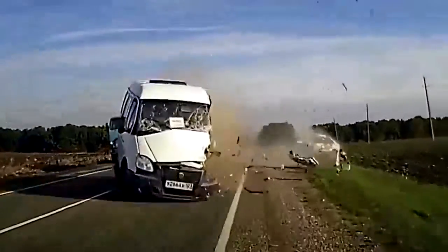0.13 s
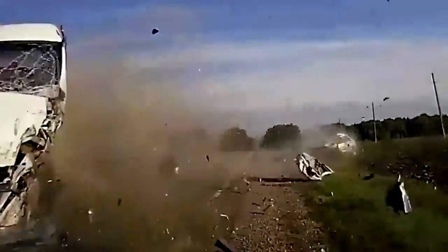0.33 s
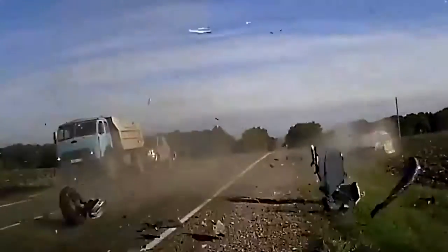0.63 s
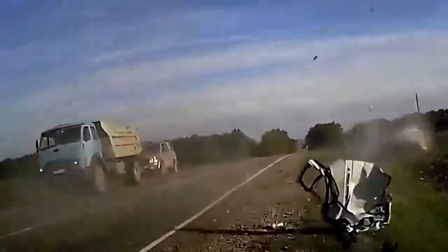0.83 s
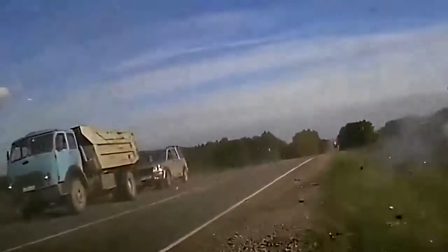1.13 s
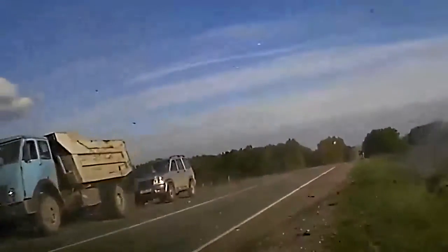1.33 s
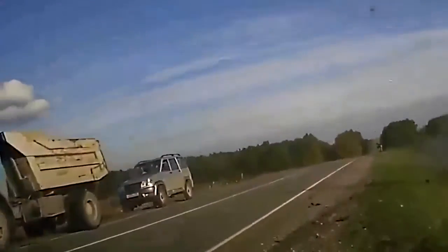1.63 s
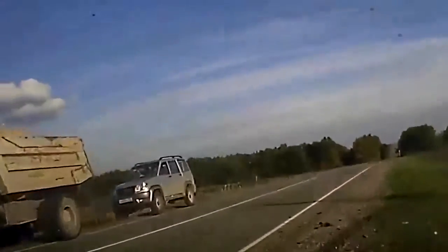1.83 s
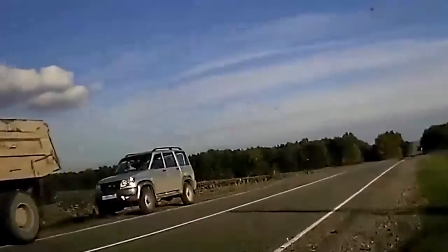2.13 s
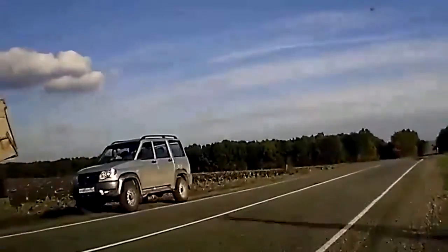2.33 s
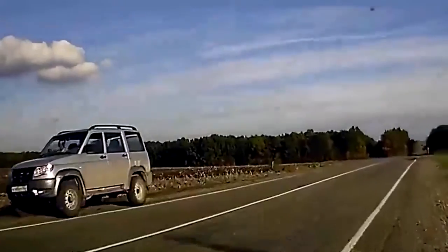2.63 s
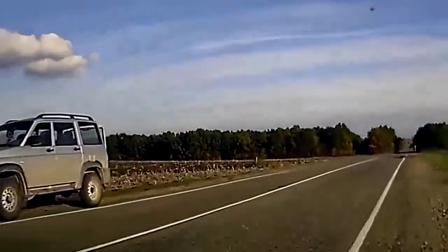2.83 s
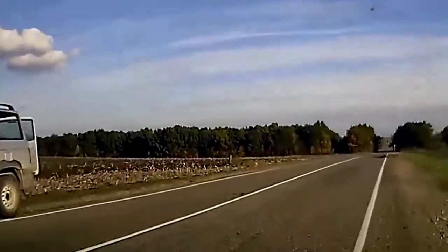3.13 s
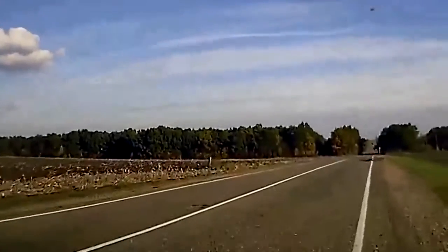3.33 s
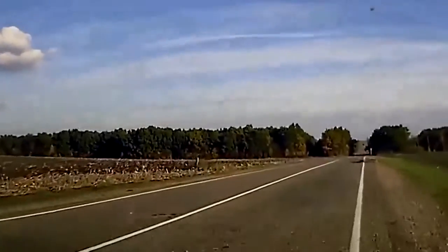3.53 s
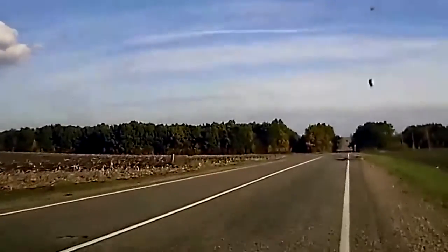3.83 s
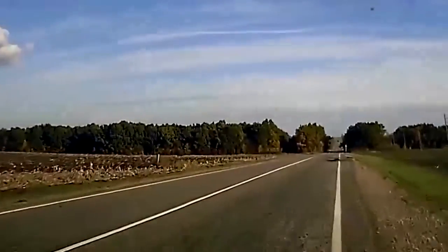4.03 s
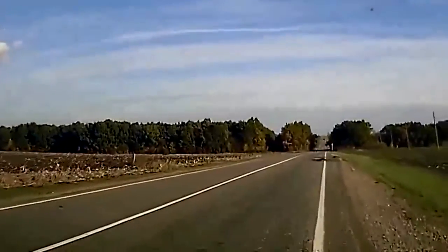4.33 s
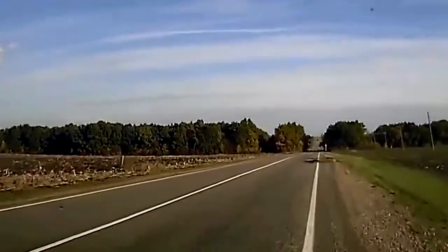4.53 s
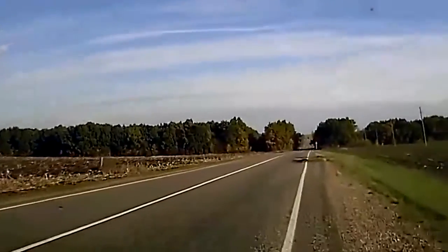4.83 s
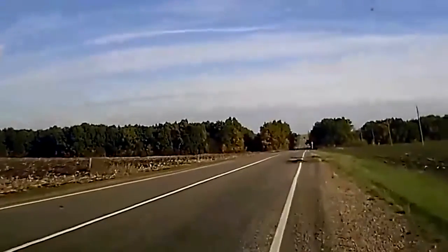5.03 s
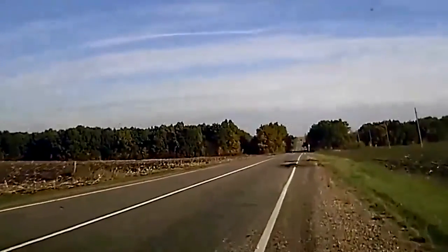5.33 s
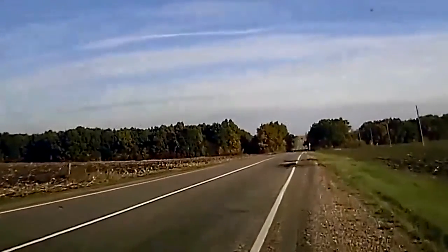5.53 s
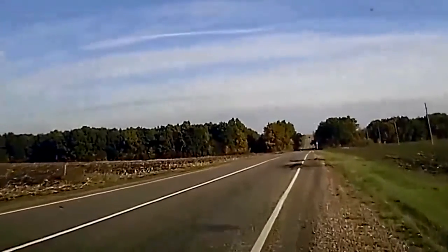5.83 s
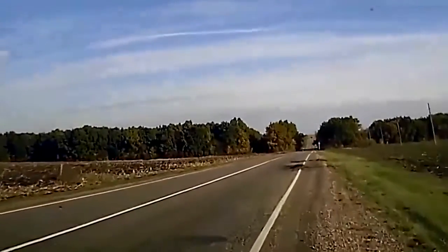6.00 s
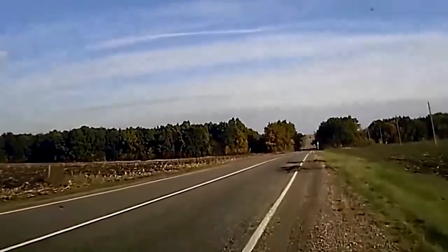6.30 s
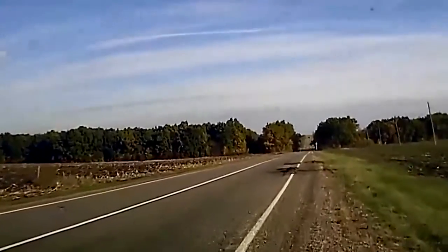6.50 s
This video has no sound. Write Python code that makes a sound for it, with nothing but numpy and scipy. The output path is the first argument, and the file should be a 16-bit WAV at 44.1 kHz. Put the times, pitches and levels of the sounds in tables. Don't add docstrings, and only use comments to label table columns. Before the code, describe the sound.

The cabin of a braking car, picked up close by a small camera microphone that clips harshly, with no extreme treble. From 0 s low tyre rumble and light body knocks; around 0.2-0.6 s rubber skids with a fuzzy, mid-pitched wavering whistle while metal scrapes past, and a hard panel knock lands at 0.3. From 0.43 debris strikes the windscreen and bodywork: sharp cracks, hollow thuds, gritty splinters, strong near 0.55 and 0.92. A denser crunch at 1.15-1.45 mixes booms, bending metal and pinging glass. Hits thin out, with a heavy one near 1.83 and duller thuds until 2.5, then a brief lull. From 2.9 to 5 s wheels grind over gravel in uneven, droning shudders with rattling trim. After 5 s quiet slow rolling, with stones knocking the floor, clearest near 5.7 and 6.6.

```python
import sys
import numpy as np
from scipy import signal
from scipy.fft import irfft
from scipy.io import wavfile

SR = 44100
rng = np.random.default_rng(int(sys.argv[2]) if len(sys.argv) > 2 else 0)


def field_ratio(decibels):
    return 10 ** (np.asarray(decibels, dtype=float) / 20)


def generate_wav(signal):
    frames = np.transpose(np.atleast_2d(signal))
    scaled = np.clip(frames, -1, 1) * 32767
    pcm = np.round(scaled).astype(np.int16)
    wavfile.write(sys.argv[1], SR, pcm)


N = 293789


# start in seconds, crack in dB, panel thud in dB re crack,
# brightness in dB re crack, own pitch in Hz.
CHUNKS = [(.4273, -9, -15, -13, 2900), (.5604, -9.5, -13, -15, 2580), (.6433, -15.5, 1, -13, 2830),
          (.7055, -17, 6, -18, 2590), (.7305, -18, -2, -9.5, 2740), (.9642, -19.5, 12, -13.5, 2810),
          (1.1936, -20, -7, -27, 2540), (1.2075, -14, 2, -15, 4100), (1.2383, -14, -5, -25, 4000),
          (1.2967, -16, 7, -17, 1720), (1.3124, -15, -2, -20, 2900), (1.3756, -11.5, -5, -16.5, 3100),
          (1.5562, -19, 3, -11.5, 3010), (1.8157, -9.5, 9.5, -12.5, 2656), (1.9105, -33, 15.5, -18, 1840),
          (2.1853, -17.5, 14.5, -13, 2440), (2.378, -32, 11, -37, 1880), (2.8513, -43, 22.5, -21, 1820),
          (4.5694, -31, 16, -16, 1940)]
SHARDS = [
    (.545, -7.5, 1, -14, 3100),
    (.9173, -6, .5, -26, 2330),
    (1.062, -10.5, -.5, -15, 2640),
    (1.2232, -16, 7.5, -24, 2620),
    (1.3537, -10, -27, -25, 2740),
    (1.476, -26.5, -2, -6, 2900),
    (1.5948, -28.5, 16.5, -11, 2950),
    (1.6572, -13.5, 2, -19, 2770),
    (1.9284, -17.5, -18, -16, 2850),
    (2.0541, -20, 3, -13, 2900),
]
# start in seconds, crack in dB,
# panel thud in dB re crack, brightness in dB re crack.
CHIPS = [(.181, -32, 6, -27), (.295, -36, 7, -30), (.318, -29.5, -7, -18), (.4974, -30, 10, -16),
         (.5139, -29, 15, -11), (.6743, -33, -1, -5), (.7447, -27, 2, -16), (.786, -23.5, -8, -12.5),
         (.825, -26, 2, -18), (.846, -33, 0, -7), (.934, -32, 0, -6), (1.0938, -28.5, 3, -12),
         (1.1191, -23.5, 15, -8.5), (1.153, -25, 14, -14), (1.253, -21.5, -4, -25), (1.279, -22, -4, -23),
         (1.4077, -24.5, 14, -18), (1.4212, -26.5, 16.5, -9), (1.735, -28, 15.5, -12),
         (1.7842, -30, -1, -21), (1.803, -27, -5, -26), (1.8245, -21.5, -7, -11), (1.9738, -33, 13.5, -17),
         (2.0115, -42, 13, -16), (2.151, -27, 8, -31), (2.9672, -22.5, 5, -34), (4.7686, -32, 12, -19)]
CLODS = [
    (.444, -21, -2, -26),
    (.577, -30, -4, -22),
    (1.0577, -24.5, -11, -18),
    (1.3237, -22.5, -11, -11.5),
    (1.713, -25.5, 6, -16),
    (2.092, -27, 12, -16),
    (2.2106, -29, 9, -14),
    (2.4606, -24.5, 3.5, -16.5),
    (2.7811, -37.5, 14, -16),
]
CHUNK_T60_S, SHARD_T60_S, CHIP_T60_S, CLOD_T60_S = .072, .044, .072, .125
SCREEN_HZ = 2760


def fragments():
    small = [(*row, SCREEN_HZ) for row in CHIPS + CLODS]
    counts = [len(CHUNKS), len(SHARDS), len(CHIPS), len(CLODS)]
    t60 = np.repeat([CHUNK_T60_S, SHARD_T60_S, CHIP_T60_S, CLOD_T60_S], counts)
    return (*np.transpose(CHUNKS + SHARDS + small), t60)


# frequency in Hz, density in dB per Hz.
CRACK = [(300, -27.5), (1200, 4.5), (2000, -3), (2800, 3.5), (3600, -6.5), (4300, -8.5), (5500, -26)]
# frequency in Hz, density in dB per Hz.
GLASS = [(3000, -28), (4200, -2.5), (5300, 0), (6300, -9), (7500, -3), (9000, -11.5)]
SCREEN_SPREAD = .25
THUD_DAMPING = 1.6


def debris():
    s, db, thud, bright, hz, t60 = fragments()
    rattle = gravel(4000, 4.64, 0.73)
    rattle[np.round((s + .0008) * SR).astype(int)] = 5.0
    crack = coloured(rattle * blows(s, db - 5, t60, rise=0.0011), CRACK)
    glass = coloured(rattle * blows(s, db + bright - 1, 0.68 * t60, rise=.0004), GLASS)
    thud_burst = rattle * blows(s, db + thud - 2.5, 0.4 * t60, rise=0.00078)
    thuds = cabin(thud_burst, tilt_db=4.5, damping=THUD_DAMPING)
    push = blows(s, db - 9.5, 0.45 * t60, rise=0.00097)
    upper_hz = rng.uniform(3400, 6200, (len(s), 2)).T
    upper = sum(rings(s, db + bright - 8, f, .3 * t60, rise=.0005) for f in upper_hz)
    spread_hz = hz * (upper_hz[0] / upper_hz.mean()) ** SCREEN_SPREAD
    own_hz = np.where(hz == SCREEN_HZ, spread_hz, hz)
    own = rings(s, db - 8, own_hz, 0.59 * t60, rise=.0008)
    return crack + glass + thuds + push + upper + own


# time in seconds, load on the cabin in dB.
ROLLING = [(0, -30.5), (.4, -31), (1.0, -32), (1.56, -32), (1.8, -33.5), (1.87, -45), (2.03, -38),
           (2.39, -35), (2.84, -39), (5.06, -35), (5.25, -38), (5.49, -37.5), (6.0, -37.5), (6.18, -39.5),
           (6.66, -38.5)]
# peak in seconds, load in dB, rise and fall in seconds per 10 dB,
# chassis share in dB.
JOLTS = [(.05, -34, .05, .1, -7), (.31, -23.5, .07, .08, -14), (.44, -17, .014, .05, -20),
         (.56, -22, .025, .1, -15), (.63, -23, .05, .025, -24), (.7, -20.5, .013, .1, -20),
         (.85, -28, .1, .05, -4), (1.0, -30, .04, .1, -8), (1.185, -18, .03, .1, -3),
         (1.3, -25, .05, .1, -18), (1.45, -25.5, .06, .12, -12), (1.58, -33, .06, .12, -3),
         (1.835, -19, .03, .012, -14), (1.91, -36, .03, .12, -11), (2.09, -25, .04, .09, -20),
         (2.19, -26, .06, .2, -9), (2.49, -28.5, .12, .25, -17), (2.78, -38, .1, .1, -7)]
# start in seconds, length in seconds, load in dB,
# chassis share in dB.
RUTS = [(2.9, .08, -20.5, -24), (3.01, .25, -19.5, -15.5), (3.35, .11, -20, -17), (3.54, .13, -28.5, -24),
        (3.72, .1, -23, -23), (3.86, .14, -20.5, -22), (4.12, .18, -21.5, -20), (4.34, .15, -20, -16),
        (4.52, .17, -20.5, -15), (4.77, .1, -21.5, -20), (4.93, .09, -21, -13), (5.08, .12, -42, -3),
        (5.69, .16, -37, -10), (6.24, .08, -36, -17)]
RUT_RISE_S, RUT_FALL_S = .03, .07
ROLL_RUMBLE_DB = -14


def wheel_loads():
    t = np.arange(N) / SR
    rolling = field_ratio(np.interp(t, *np.transpose(ROLLING)))
    s, length, db, share_db = np.transpose(RUTS)[:, :, None]
    ruts, ruts_deep = humps(s, s + length, db, RUT_RISE_S, RUT_FALL_S, share_db)
    s, *jolt = np.transpose(JOLTS)[:, :, None]
    jolts, jolts_deep = humps(s, s, *jolt)
    rumble = together(rolling * field_ratio(ROLL_RUMBLE_DB), ruts_deep, jolts_deep)
    return rolling, ruts, jolts, rumble


# time in seconds, strength in dB.
SHOWER = [
    (0, -44.5),
    (.45, -38.5),
    (.56, -28),
    (.72, -32),
    (.89, -49),
    (1.2, -32.5),
    (1.33, -35),
    (1.46, -43),
    (1.84, -45),
]
# start and end in seconds, level in dB, rise and fall in seconds per 10 dB,
# chassis share in dB.
SHATTER = (1.17, 1.26, -41, .03, .12, 0)
# frequency in Hz, density in dB per Hz.
GRIT = [(800, -33), (1300, -1.5), (1700, -8), (2150, -13.5), (2500, -11), (2800, -6.5), (3150, -11.5),
        (3350, -20), (3800, -26), (4300, -32.5)]
# frequency in Hz, density in dB per Hz.
SPRAY = [(2060, -34), (3500, -5), (4340, -2), (5970, -14), (7500, -13.5), (8010, -16.5), (8400, -29.5),
         (10900, -58.5), (18500, -120)]
# frequency in Hz, density in dB per Hz.
RUMBLE = [(20, -21.5), (60, -17), (100, -10.5), (150, -13.5), (210, -7), (280, -6.5), (400, -50.5)]
TREAD_DB, ROLL_GRIT_DB, JOLT_GRIT_DB = -49, -9, -18
GRIT_SHARE, GRIT_DB = 1.4, -10.5
ROLL_SPRAY_DB = -20
DUST_SHARE, DUST_DB, DUST_ARRIVES_S = 2.1, 8, .45
SPRAY_SHARE, SPRAY_DB, SPRAY_FADE_DB_PER_S = 1.4, -20.5, 2.3
SHOWER_SPRAY_SHARE, SHOWER_SPRAY_DB = 1.35, -4
SKID_TILT_DB, TILT_FADE_S = 5, .8


def tyres():
    t = np.arange(N) / SR
    rolling, ruts, jolts, rumble = wheel_loads()
    load = together(rolling, ruts, jolts)
    shower = field_ratio(np.interp(t, *np.transpose(SHOWER), right=-99))
    crumbs, _ = humps(*np.array(SHATTER)[:, None, None])

    tread = np.minimum(field_ratio(ROLL_GRIT_DB) * rolling, field_ratio(TREAD_DB))
    jolt_grit = field_ratio(JOLT_GRIT_DB) * jolts
    grit = together(tread, jolt_grit, field_ratio(GRIT_DB) * ruts ** GRIT_SHARE, shower)

    road_spray = field_ratio(ROLL_SPRAY_DB) * together(tread, jolt_grit)
    dust = field_ratio(DUST_DB) * rolling ** DUST_SHARE * (t > DUST_ARRIVES_S)
    rut_spray = field_ratio(SPRAY_DB - SPRAY_FADE_DB_PER_S * t) * ruts ** SPRAY_SHARE
    shower_spray = field_ratio(SHOWER_SPRAY_DB) * shower ** SHOWER_SPRAY_SHARE
    spray = together(road_spray, dust, crumbs, rut_spray, shower_spray)

    bumps = wobble(17, 0.95)
    tilt_db = SKID_TILT_DB * np.exp(-(t / TILT_FADE_S) ** 2)
    shaken = flexed(cabin(gravel(900, 3.0, 1.0) * bumps, tilt_db), bumps)
    return (load * shaken
            + grit * coloured(gravel(1500, 1.6, 2.2) * bumps, GRIT)
            + spray * coloured(gravel(2500, 2.5, 1.5) * bumps, SPRAY)
            + rumble * coloured(rng.standard_normal(N) * wobble(8, 2.1), RUMBLE))


# start in seconds, level in dB, pitch in Hz, t60 in seconds.
KNOCKS = [(0.048, -16, 552, 0.074), (0.087, -18, 792, 0.05), (0.118, -16.5, 696, 0.05),
          (0.14, -16, 635, 0.05), (0.313, -6.5, 738, 0.04), (0.444, -11, 630, 0.066),
          (0.702, -11, 604, 0.072), (0.839, -18.5, 582, 0.074), (1.165, -6.5, 596, 0.075),
          (1.204, -15, 649, 0.09), (1.215, -8, 196, 0.046), (1.244, -16, 320, 0.1),
          (1.284, -10, 804, 0.059), (1.319, -16.5, 673, 0.11), (1.41, -4.5, 558, 0.055),
          (1.819, -17, 1016, 0.035), (1.839, -17, 594, 0.052), (2.083, -19, 515, .15),
          (2.099, -19, 754, 0.074), (2.185, -18, 1440, .06), (2.182, -13, 810, 0.033),
          (2.462, -21, 842, 0.045), (2.499, -19.5, 668, 0.065), (2.54, -17.5, 604, 0.087)]
TRIM = [(2.886, -17, 710, 0.27), (3.019, -9.5, 529, 0.13), (3.713, -19.5, 730, 0.062),
        (3.845, -10.5, 716, 0.095), (5.559, -29.5, 700, 0.16), (5.691, -22, 513, 0.064),
        (5.759, -24, 548, 0.13), (6.009, -29, 745, 0.09), (6.237, -33, 688, 0.1), (6.279, -24.5, 540, 0.09),
        (6.479, -30.5, 327, 0.18)]
BOOMS = [
    (0.314, -11.5, 330, 0.049),
    (0.432, -21, 367, 0.14),
    (0.831, -20, 395, 0.085),
    (1.158, -20, 145, 0.12),
    (1.185, -12, 194, 0.085),
    (1.268, -18.5, 410, 0.1),
    (1.299, -14.5, 398, 0.087),
    (1.407, -23, 210, 0.13),
    (1.823, -16, 348, 0.094),
    (2.187, -35, 315, 0.084),
]
EXTRA_KNOCKS = [
    (0.427, -13, 724, .1),
    (5.045, -17, 680, 0.17),
    (.92, -16.5, 950, 0.066),
]
PINGS = [
    (1.202, -23, 4070, .05),
    (1.216, -20, 4080, .05),
    (1.236, -22, 4060, .06),
    (1.247, -25, 4040, .04),
]
BLOWS = [
    (0.881, -25, 713, .04),
    (0.965, -21, 972, .035),
    (1.065, -21, 627, .04),
    (1.526, -26, 633, .04),
    (1.633, -25, 581, .04),
    (1.659, -21, 641, .04),
    (1.715, -29, 794, .04),
    (2.351, -25, 692, .04),
]


def knocks():
    return rings(*np.transpose(KNOCKS + TRIM + BOOMS + EXTRA_KNOCKS + PINGS + BLOWS), rise=.0021)


# time in seconds, level in dB, pitch in Hz.
SKID = [
    (.04, -58, 700),
    (.21, -31, 788.6),
    (.25, -40, 800),
    (.285, -22.5, 769.5),
    (.36, -28, 775),
    (.46, -25.5, 645),
    (.505, -26, 764),
    (.57, -31, 791),
    (.66, -38, 750),
]


def skid():
    s, db, hz = np.transpose(SKID)
    t = np.arange(N) / SR
    phase = 2 * np.pi * np.cumsum(np.interp(t, s, hz) * wobble(67, 0.3)) / SR
    level = field_ratio(np.interp(t, s, db, -99, -99) + .4)
    return level * wobble(40, 3.0) * (np.sin(phase) + 0.15 * np.sin(2 * phase))


# start in seconds, level in dB, first and last pitch in Hz, length in seconds.
GLIDES = [(1.892, -31, 288, 620, .058), (.17, -26, 760, 900, .065), (.25, -27, 870, 800, .03),
          (.375, -24, 790, 690, .05), (.3, -33, 1530, 1480, .05), (1.122, -24, 1200, 600, .025),
          (1.205, -16, 650, 210, .025), (1.228, -19, 620, 250, .025), (1.275, -20, 600, 850, .022),
          (1.972, -28, 1050, 600, .03), (2.055, -30, 900, 300, .025)]
# start in seconds, level in dB, pitch in Hz,
# length in seconds.
DRONES = [(2.92, -24, 540, .07), (2.99, -22, 700, .05), (3.04, -22, 520, .05), (3.11, -21, 530, .09),
          (3.16, -25, 725, .07), (3.38, -27, 322, .07), (3.39, -28, 505, .06), (3.58, -30, 515, .09),
          (3.72, -29, 330, .06), (3.85, -26, 310, .08), (3.9, -23, 530, .08), (3.98, -24, 510, .05),
          (4.08, -26, 795, .06), (4.11, -26, 310, .06), (4.14, -23, 510, .05), (4.19, -24, 540, .09),
          (4.28, -25, 305, .07), (4.34, -23, 520, .09), (4.43, -24, 700, .08), (4.49, -23, 510, .06),
          (4.54, -23, 730, .08), (4.58, -23, 520, .13), (4.5, -28, 320, .09), (4.66, -28, 300, .06),
          (4.75, -25, 500, .05), (4.78, -26, 330, .06), (4.86, -27, 320, .06), (4.95, -27, 330, .07),
          (5.0, -25, 640, .06)]


def swells():
    out = np.zeros(N)
    steady = [(s, db, hz, hz, length) for s, db, hz, length in DRONES]
    for s, db, first_hz, last_hz, length in GLIDES + steady:
        hz = np.linspace(first_hz, last_hz, round(length * SR))
        tone = np.sin(2 * np.pi * np.cumsum(hz) / SR)
        out[round(s * SR):][:len(hz)] += field_ratio(db) * signal.windows.tukey(len(hz), .6) * tone
    return out * wobble(60, 2.2) * field_ratio(-1.5)


# start in seconds, level in dB, t60 in seconds.
STONES = [
    (5.381, -23, 0.054),
    (5.496, -23.5, 0.17),
    (5.563, -22, 0.093),
    (5.694, -13.5, 0.053),
    (5.819, -34, 0.068),
    (6.011, -29, 0.06),
    (6.282, -23, 0.041),
    (6.592, -18, 0.052),
]


def stones():
    s, db, t60 = np.transpose(STONES)
    burst = rng.standard_normal(N) * blows(s, db, t60, rise=0.003)
    return field_ratio(-7.5) * cabin(burst) + field_ratio(-25) * coloured(burst, CRACK)


# frequency in Hz, density in dB per Hz.
SCRAPE = [(2300, -22), (2900, -4), (3250, 0), (3650, -9), (4400, -8), (4900, -32)]
SCRAPE_DB, SCRAPE_PEAK_S, SCRAPE_RISE_S, SCRAPE_FALL_S = -47.5, .26, 1.1, .2


def scrape():
    hump = [SCRAPE_PEAK_S, SCRAPE_PEAK_S, SCRAPE_DB, SCRAPE_RISE_S, SCRAPE_FALL_S, 0]
    level, _ = humps(*np.array(hump)[:, None, None])
    return level * wobble(25, 2.2) * coloured(gravel(1500, 2.2, 1.6), SCRAPE)


# frequency in Hz, width in Hz, level in dB.
CABIN = [(118, 18, -22.5), (199.8, 14.6, -14), (243.4, 18.2, -12.5), (315, 27.8, -4), (341.5, 26.2, -2.5),
         (415.4, 25.3, -5), (461.3, 18.5, -3.5), (509.7, 17, 1), (540.9, 25.3, 1), (606.8, 29, -1),
         (645, 20.7, -2), (702.4, 22.6, 0), (757.5, 25, -2.5), (800, 33.4, -2.5), (845, 105, -7),
         (993, 37.6, -6.5), (1095, 18, -9), (1142, 40, -14.5), (1190.3, 22, -8.5), (1288, 39, -17),
         (1396, 16, -17.5), (1468, 28, -24), (1593, 84, -23)]


def cabin(x, tilt_db=0., damping=1.0):
    t = np.arange(4096) / SR
    modes = []
    for k, (hz, width, db) in enumerate(CABIN):
        decay = np.exp(-np.pi * damping * width * t)
        modes.append(field_ratio(db) * width * decay * np.sin(2 * np.pi * hz * t) * (-1) ** k)
    modes = np.array(modes)
    groups = np.split(modes, [9, 14])
    low, middle, high = (signal.oaconvolve(x, group.sum(0))[:N] for group in groups)
    return (low / field_ratio(tilt_db) + middle + high * field_ratio(tilt_db)) / np.linalg.norm(modes.sum(0))


def flexed(x, bumps):
    flex_samples = 5
    return np.interp(np.arange(N) + flex_samples * evened(np.log(bumps)), np.arange(N), x)


def gravel(per_s, spread_db, smooth):
    sizes = field_ratio(spread_db * np.minimum(rng.exponential(1, N), 5))
    pops = (rng.random(N) < per_s / SR) * sizes
    return evened(evened(pops * rng.standard_normal(N)) + smooth * rng.standard_normal(N))


def blows(times, levels_db, t60s, rise):
    power, t = np.zeros(N + 8000), np.arange(8000) / SR
    for s, db, t60 in zip(times, levels_db, t60s):
        burst = field_ratio(db - 60 * t / max(t60, .005)) * (1 - np.exp(-t / rise))
        power[round(s * SR):][:8000] += burst ** 2
    return np.sqrt(power[:N])


def rings(times, levels_db, pitches_hz, t60s, rise):
    out, t = np.zeros(N + 8000), np.arange(8000) / SR
    for s, db, hz, t60 in zip(times, levels_db, pitches_hz, t60s):
        envelope = field_ratio(db - 60 * t / max(t60, .005)) * (1 - np.exp(-t / rise))
        out[round(s * SR):][:8000] += envelope * np.sin(2 * np.pi * hz * t)
    return out[:N] * wobble(130, 2.5)


def humps(start, end, db, rise, fall, share_db):
    t = np.arange(0, N, 64) / SR
    outside = np.maximum(np.maximum((start - t) / rise, (t - end) / fall), 0)
    power = field_ratio(2 * (db - 10 * outside))
    both = (power, power * field_ratio(2 * share_db))
    return (np.interp(np.arange(N) / SR, t, np.sqrt(p.sum(0))) for p in both)


def together(*levels):
    return np.sqrt(sum(a ** 2 for a in levels))


def wobble(hz, depth_db):
    slow = signal.lfilter(*signal.butter(2, hz, fs=SR), rng.standard_normal(N))
    return field_ratio(depth_db * evened(slow))


def coloured(x, points):
    f, db = np.transpose(points)
    hz = np.fft.rfftfreq(1024, 1 / SR)
    response = field_ratio(np.interp(np.log(hz + 1), np.log(f), db, -90, -90))
    taps = np.roll(irfft(response), 512) * np.hanning(1024)
    return signal.oaconvolve(x, taps / np.linalg.norm(taps), "same")


def evened(x):
    return x / np.sqrt(np.mean(x ** 2) + 1e-20)


def scene():
    return (debris() + tyres() + knocks() + skid() + swells() + stones() + scrape())[None]


def low_pass(x):
    return signal.sosfilt(signal.butter(12, 9110, fs=SR, output="sos"), x)


HISS_DB, EDGE_HZ = -61.5, 8050


def record(dry):
    x = dry + field_ratio(HISS_DB) * rng.standard_normal(dry.shape)
    top, bottom = .34, .13
    positive = x / (1 + (abs(x) / top) ** 4) ** (1 / 4)
    negative = x / (1 + (abs(x) / bottom) ** 3.55) ** (1 / 3.04)
    x = np.where(x > 0, positive, negative)
    x = signal.lfilter(*signal.butter(1, 18, "high", fs=SR), x) - .0007
    band_limit = signal.firwin(141, EDGE_HZ, window=("kaiser", 8), fs=SR)
    x = signal.oaconvolve(x, band_limit[None], "same")
    return low_pass(x)


dry = scene()
out = record(dry)
generate_wav(out)
```